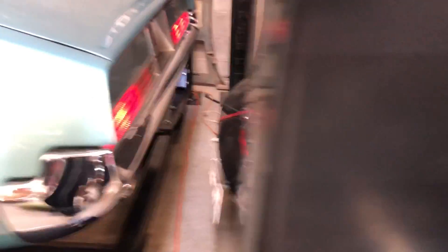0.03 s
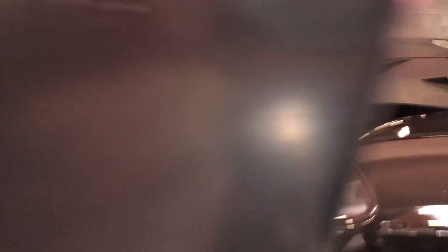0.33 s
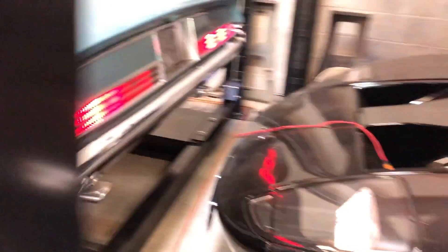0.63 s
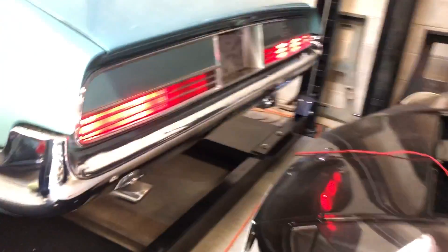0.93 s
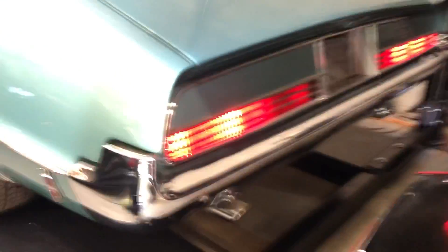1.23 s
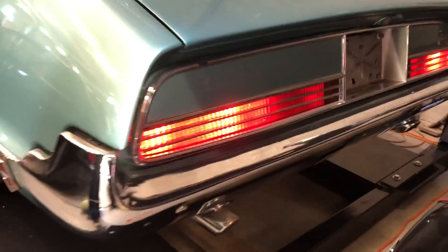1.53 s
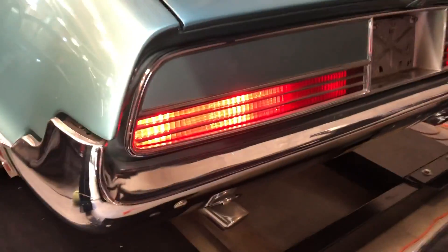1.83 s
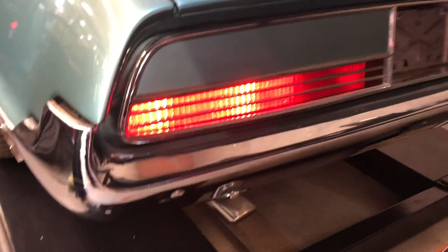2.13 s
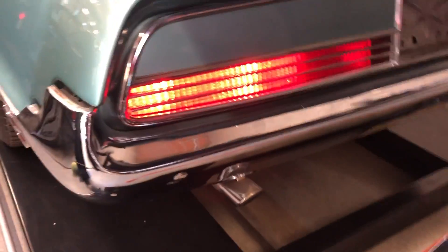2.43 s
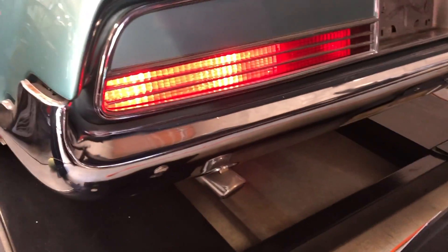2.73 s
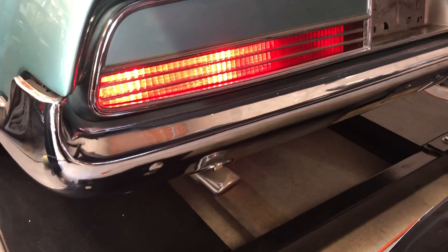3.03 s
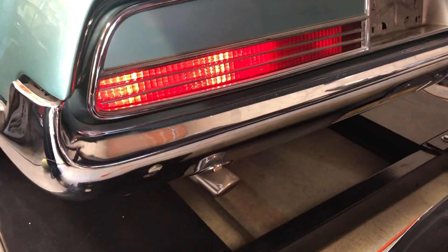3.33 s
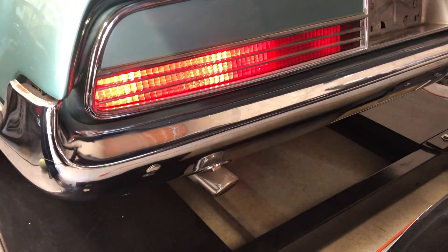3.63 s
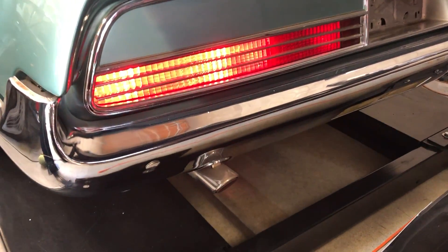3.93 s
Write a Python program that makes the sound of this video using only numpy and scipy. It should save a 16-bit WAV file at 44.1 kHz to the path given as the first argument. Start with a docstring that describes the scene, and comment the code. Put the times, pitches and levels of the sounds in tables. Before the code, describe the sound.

A classic V8 car engine starts in a quiet garage, near the end. For the first three seconds there are only soft shoe scuffs, ticks, thuds and rustling clothes over faint air noise and a hum. At about 3.1 seconds the starter clacks in and grinds briefly. Around 3.5 seconds the engine catches with a loud, booming roar, just beginning to settle by 4 seconds.

```python
"""A classic V8 starts in a quiet garage: it catches, flares with a roar and begins to settle.
Each firing sends a pulse and a gas puff down a ringing pipe, over the boom of the uneven banks.
Just before, the starter clacks in and its gears grind for a third of a second.
First, someone steps up to the tail: soles scuff, clothes rustle, shoes and handling tick and thud.
Air noise and a faint appliance hum lie underneath."""
import sys
import numpy as np
from scipy import signal
from scipy.fft import rfft
from scipy.io import wavfile
from scipy.ndimage import uniform_filter1d

SR = 44100
rng = np.random.default_rng(int(sys.argv[2]) if len(sys.argv) > 2 else 0)


def to_wav(s):
    """Save 16-bit WAV."""
    ch = np.atleast_2d(s).T  # columns
    pcm = np.round(np.clip(ch, -1, 1) * 32767)  # PCM
    wavfile.write(sys.argv[1], SR, pcm.astype(np.int16))


N = 176400
TIME_S = np.arange(N) / SR
FREQ_HZ = np.fft.rfftfreq(N, 1 / SR)

# garage reverberation: freq_hz, t60_s
ROOM_DECAY = [(100, 0.52), (1000, 0.46), (2000, 0.58), (3000, 1), (4500, 0.7), (7000, 0.44), (15000, 0.36)]
# room air: freq_hz, gain_db
AIR_SPECTRUM = [(25, -27), (55, 5.5), (108, -1.5), (212, 1.5), (516, -13.5), (624, -11), (677, -10),
                (754, -16.5), (988, -17.5), (2700, -28.5), (8360, -42), (14800, -48), (16000, -30)]
# appliance hum: pitch_hz, level_db
HUM_TONES = [(665, -88), (688.5, -67.5)]

# cloth rustle: time_s, body_db, fizz_db
RUSTLE_LEVELS = [(0, -63, -70.5), (.27, -66, -67), (.38, -67, -73), (.72, -63, -69.5), (.85, -56.5, -62),
                 (1.0, -61, -69), (1.2, -66.5, -72.5), (1.4, -65, -73), (1.62, -63, -64), (1.68, -73, -72),
                 (1.77, -66.5, -87), (1.85, -59, -82), (2.12, -60, -74), (2.33, -80, -82),
                 (2.62, -66, -84.5), (2.8, -71.5, -80.5), (3.05, -74, -89)]
# cloth body: freq_hz, gain_db
CLOTH_SPECTRUM = [(200, 4.5), (1000, 3), (3000, -2.5), (5500, -7.5), (8000, -17.5), (16000, -29)]
# cloth fizz: freq_hz, gain_db
FIZZ_SPECTRUM = [(1000, -50), (5000, -0.5), (8000, -3), (16000, -2)]

# shoe scuffs: start_s, length_s, sole_db, grit_db
SHOE_SCUFFS = [(0.58, 0.022, -56, -76), (0.653, .004, -77, -71), (0.739, 0.014, -54.5, -51),
               (0.814, .006, -52, -66), (0.918, 0.01, -60, -61), (1.385, 0.012, -51.5, -59),
               (1.4, 0.034, -47.5, -51.5), (1.447, 0.015, -58, -63), (1.537, 0.0091, -60, -70),
               (1.925, 0.02, -59, -59), (1.943, 0.023, -55.5, -62), (1.985, 0.0074, -62, -51),
               (2.154, 0.017, -52, -58), (2.178, 0.018, -47.5, -49.5), (2.207, 0.037, -54, -77),
               (2.368, 0.05, -41, -54)]
# ring of sole and floor: freq_hz, width_hz, peak_db
SOLE_MODES = [(1034, 59, 12.5), (2750, 140, 2.5)]
# sole scrape: freq_hz, gain_db
SOLE_SPECTRUM = [(100, -15), (500, -9), (1050, -5.5), (1800, 0), (2900, -0.5), (4500, -2), (7000, -4),
                 (9000, -12.5), (16000, -15)]
# dragged grit: freq_hz, gain_db
GRIT_SPECTRUM = [(1000, -3), (4000, -11), (7000, 1.5), (9000, -2.5), (16000, -3)]

# ticks and thuds of shoes and handling: start_s, tick_db, tilt_db_per_octave, thud_db, thud_hz
TICKS_AND_THUDS = [(0.583, -44, -6, -64, 400), (0.7394, -37, -2, -50, 422), (.869, -60, -9, -48, 470),
                   (1.053, -70, 2, -41.5, 440), (1.228, -48, -4, -41.5, 280), (1.301, -38, 0.5, -63, 600),
                   (1.32, -38, -3, -41, 350), (1.384, -37.5, -5, -42.5, 343), (1.394, -51, -14, -41, 650),
                   (2.156, -39, 1, -60, 600), (3.013, -79, -5, -39, 159)]
# sharp tick: freq_hz, gain_db
TICK_SPECTRUM = [(100, -12), (1000, -1.5), (5000, -6.5), (9000, -11), (16000, -4.5)]

# starter body ring: pitch_hz, level_db
CLUNK_TONES = [(410, -35.5), (522, -38), (764, -34.5)]
# starter and drive knocks: start_s, level_db, tilt_db_per_octave, decay_s, ring_hz, ring_db
METAL_KNOCKS = [(3.095, -38, -0.8, 0.044, 5920, 9), (3.12, -30, -2.54, 0.031, 1140, 9),
                (3.373, -34.5, -3, 0.049, 1427, 23), (3.378, -39.5, 2.5, 0.081, 5070, 17),
                (3.442, -33, 6, 0.013, 4600, 1), (3.472, -22.5, 12.5, 0.0097, 7950, 15),
                (3.493, -27, -9, 0.014, 1350, 8), (3.611, -26.5, -3, 0.028, 3430, 10),
                (3.741, -30.5, -2, 0.052, 5260, 7.5), (3.864, -28, -1, 0.042, 2740, 11)]
# metal knock: freq_hz, gain_db
KNOCK_SPECTRUM = [(59, -39), (160, -5), (289, -28), (524, -5), (621, -26), (768, -4.5), (910, -16),
                  (1580, -12), (4380, -12), (4770, -8), (16000, -27.5)]
# gear grind: time_s, level_db
GRIND_LEVELS = [(3.09, -56), (3.13, -37), (3.2, -39.5), (3.27, -38), (3.36, -37), (3.44, -31.5),
                (3.52, -22.5), (3.62, -81)]
# gear grind: freq_hz, gain_db
GRIND_SPECTRUM = [(35, -30), (60, -1.5), (139, -6), (172, 5.5), (244, -12), (338, -1), (398, -7.5),
                  (767, -1.5), (1910, -7), (2410, -7.5), (4750, -12), (6740, -22), (16000, -36.5)]
# starter housing: freq_hz, width_hz, peak_db
HOUSING_MODES = [(512, 17, 3.4), (1174, 88, 2.3), (1395, 56, 6.2), (3170, 63, 5.3), (3510, 120, 5.1),
                 (4760, 94, 3.6), (5500, 130, 6.3)]
# slipping teeth: centre_s, sigma_s, pitch_hz, level_db
TOOTH_CHIRPS = [(3.24, .011, 2640, -47), (3.317, 0.0082, 2455, -35.5), (3.386, 0.012, 1117, -36.5)]

# engine speed: time_s, firing_hz
FIRING_RATE = [(3.1, 12), (3.4, 26), (3.44, 38), (3.48, 42), (3.53, 60), (3.56, 63), (3.6, 69.5),
               (3.65, 75), (3.78, 76.3), (3.85, 72.3), (4.0, 71.5)]
# cylinders in firing order, near bank louder: gain_db
CYLINDER_GAINS_DB = [4.5, 0, 2, 1.5, 0.5, -0.5, 4, 0]
# exhaust boom: time_s, tone_db, beat_db
BOOM_LEVELS = [(3.1, -72, -70), (3.42, -62, -52), (3.465, -33.5, -31), (3.505, -29, -25.5),
               (3.54, -16.5, -26.5), (3.6, -18, -27), (3.635, -20, -17.5), (3.67, -16.5, -27),
               (3.76, -21, -21), (3.86, -20, -28.5), (3.92, -28, -31), (3.955, -36, -35),
               (3.985, -21.5, -41)]
# beat of the banks: multiple_of_four_stroke_cycle, gain_db
BEAT_ORDERS = [(5, -11), (7, -8), (11, -4), (13, -0.5), (16, 0.5), (19, -0.5), (21, -14.5), (24, -14)]
# exhaust roar: time_s, bark_db, hiss_db
ROAR_LEVELS = [(3.36, -70, -53), (3.44, -55, -36.5), (3.48, -32.5, -25), (3.53, -24, -31),
               (3.565, -19, -26.5), (3.61, -30.5, -33), (3.68, -27.5, -32.5), (3.78, -30, -33),
               (3.84, -26.5, -33), (3.885, -26, -42), (3.94, -32, -46), (4.0, -31.5, -42.5)]
# exhaust bark: freq_hz, gain_db
BARK_SPECTRUM = [(60, -22), (180, 5), (260, -10), (400, -2), (560, -2.5), (800, -8), (1100, -10.5),
                 (1450, -7), (1650, -15), (2500, -23.5), (8000, -40)]
# gas hiss: freq_hz, gain_db
HISS_SPECTRUM = [(300, -24), (1200, -1), (1800, -3.5), (2700, 0), (3600, -3.5), (4400, -4.5), (5300, -2.5),
                 (7000, -6.5), (10000, -9), (13000, -12.5), (16000, -16.5)]
# ring of pipe and car body: freq_hz, width_hz, peak_db
PIPE_MODES = [(410, 58, 5.5), (540, 44, 8), (664.5, 32, 9.5), (823, 26, 5.5), (1294, 28, 6.5),
              (1510, 44, 8.5), (1740, 16, 5), (1891, 12.4, 13.5), (2300, 96, 2.5), (2790, 110, 3.5),
              (3750, 42, 5.5)]


def amp(db):
    """Decibels to gain."""
    return 10 ** (np.asarray(db) / 20)


def unit(x):
    """Scale to rms 1."""
    return x / np.sqrt(np.mean(x ** 2) + 1e-20)


def curve(rows, column=1):
    """One column of a time table at every sample."""
    rows = np.array(rows)
    return np.interp(TIME_S, rows[:, 0], rows[:, column])


def at_freq(rows, hz):
    """Interpolate a table over log frequency."""
    row_hz, values = np.transpose(rows)
    return np.interp(np.log(hz + 1), np.log(row_hz + 1), values)


def colour(x, spectrum, tilt_db_per_octave=0, modes=()):
    """Filter by spectrum, tilt and resonant peaks; rms 1."""
    octaves = np.log2(np.maximum(FREQ_HZ, 200) / 2000)
    gain_db = at_freq(spectrum, FREQ_HZ) + tilt_db_per_octave * octaves
    for hz, width_hz, peak_db in modes:
        gain_db += peak_db / (1 + (2 * (FREQ_HZ - hz) / width_hz) ** 2)
    return unit(np.fft.irfft(rfft(x) * amp(gain_db), N))


def noise(spread_db=0):
    """White noise, its level varying from grain to grain by spread_db; rms 1."""
    white = rng.standard_normal(N)
    grains = unit(uniform_filter1d(rng.standard_normal(N), size=24))
    return unit(white * amp(spread_db * grains))


def drift(hz):
    """Random wander, low-passed at hz; rms 1."""
    return unit(np.fft.irfft(rfft(rng.standard_normal(N)) / (1 + (FREQ_HZ / hz) ** 4), N))


def garage(x, wet_db):
    """Add dense reflections, each band dying at its own rate."""
    echoes = rng.standard_normal(SR) * (rng.random(SR) < .1) * (TIME_S[:SR] > .005)
    hz, age_s, bands = signal.stft(echoes, SR, nperseg=256)
    decay = amp(-60 * age_s / at_freq(ROOM_DECAY, hz)[:, None])
    tail = signal.istft(bands * decay, SR, nperseg=256)[1]
    wet = signal.fftconvolve(x, tail / np.linalg.norm(tail))[:N]
    return (x + amp(wet_db) * wet) / np.hypot(1, amp(wet_db))


def background(air_db=-54, waver_rad=0.35):
    """Low air noise and a wavering appliance hum."""
    hum = sum(amp(db) * np.sqrt(2) * np.sin(2 * np.pi * hz * TIME_S + waver_rad * drift(hz=1.7))
              for hz, db in HUM_TONES)
    return amp(air_db) * colour(noise(), AIR_SPECTRUM) + hum


def clothes(flicker_db=1.8):
    """Cloth rubs softly, with a fine fizz on top."""
    body = amp(curve(RUSTLE_LEVELS)) * colour(noise(spread_db=2.5), CLOTH_SPECTRUM)
    fizz_db = curve(RUSTLE_LEVELS, column=2) + flicker_db * drift(hz=24)
    return body + amp(fizz_db) * colour(noise(spread_db=2.5), FIZZ_SPECTRUM)


def shoes(rise_s=0.0064, fall_s=0.009):
    """Soles scrape on concrete and drag grit along."""
    sole_gain, grit_gain = np.zeros((2, N))
    for start_s, length_s, sole_db, grit_db in SHOE_SCUFFS:
        age_s = TIME_S - start_s
        envelope = np.clip(age_s / rise_s, 0, 1) * np.exp(-np.maximum(age_s - length_s, 0) / fall_s)
        sole_gain += amp(sole_db) * envelope
        grit_gain += amp(grit_db) * envelope
    scrape = sole_gain * colour(noise(spread_db=0.5), SOLE_SPECTRUM, modes=SOLE_MODES)
    grit = grit_gain * colour(noise(spread_db=0.5), GRIT_SPECTRUM)
    return garage(scrape + grit, wet_db=-9)


def ticks_and_thuds(tick_s=0.00057, thud_s=0.0033, sag_s=0.0012, sag_depth=1.63):
    """Shoes and handling: sharp ticks, and soft thuds that drop quickly to their pitch."""
    out = np.zeros(N)
    for start_s, tick_db, tilt, thud_db, thud_hz in TICKS_AND_THUDS:
        age_s = np.maximum(TIME_S - start_s, 0)
        tick_envelope = age_s / tick_s * np.exp(1 - age_s / tick_s)
        thud_envelope = age_s / thud_s * np.exp((1 - (age_s / thud_s) ** 2) / 2)
        cycles = thud_hz * (age_s + sag_depth * sag_s * (1 - np.exp(-age_s / sag_s)))
        out += amp(tick_db) * tick_envelope * colour(noise(), TICK_SPECTRUM, tilt)
        out += amp(thud_db) * thud_envelope * np.sin(2 * np.pi * cycles)
    return out


def pinion_clunk(start_s=3.12, t60_s=0.33):
    """The pinion hits home and rings the starter body."""
    age_s = np.maximum(TIME_S - start_s, 0)
    return sum(amp(db - 60 * age_s / t60_s) * np.sin(2 * np.pi * hz * age_s) for hz, db in CLUNK_TONES)


def starter(mesh_hz=382.7, mesh_depth=0.41, ring_width_ratio=0.06):
    """Gear teeth grind, solenoid and drive knock; both ring the housing."""
    teeth = 1 + mesh_depth * np.cos(2 * np.pi * mesh_hz * TIME_S + drift(hz=18))
    grind = colour(teeth * noise(spread_db=1.5), GRIND_SPECTRUM, modes=HOUSING_MODES)
    out = amp(curve(GRIND_LEVELS)) * (TIME_S > GRIND_LEVELS[0][0]) * grind
    for start_s, level_db, tilt, decay_s, ring_hz, ring_db in METAL_KNOCKS:
        age_s = np.maximum(TIME_S - start_s, 0)
        envelope = np.minimum(age_s / 0.0058, 1) * np.exp(-(age_s / decay_s) ** 2 / 2)
        modes = HOUSING_MODES + [(ring_hz, ring_hz * ring_width_ratio, ring_db)]
        out += amp(level_db) * envelope * colour(noise(spread_db=0.5), KNOCK_SPECTRUM, tilt, modes)
    return garage(out, wet_db=-8)


def gear_chirps(waver_rad=0.5):
    """Slipping teeth give short, uneven squeaks."""
    out = np.zeros(N)
    for centre_s, sigma_s, pitch_hz, level_db in TOOTH_CHIRPS:
        envelope = np.exp(-((TIME_S - centre_s) / sigma_s) ** 2 / 2)
        phase_rad = 2 * np.pi * pitch_hz * TIME_S + waver_rad * drift(hz=90.5)
        out += amp(level_db) * envelope * np.sin(phase_rad)
    return out


def exhaust_boom(firings, waver_rad=0.24):
    """The firing tone, plus the uneven beat of the two banks at orders around it."""
    tone = np.sqrt(2) * np.sin(2 * np.pi * firings + waver_rad / 2 * drift(hz=23))
    cycles = firings / len(CYLINDER_GAINS_DB)
    beat = sum(amp(db) * np.sin(2 * np.pi * (order * cycles + rng.random()) + waver_rad * drift(hz=13))
               for order, db in BEAT_ORDERS)
    boom = amp(curve(BOOM_LEVELS)) * tone + amp(curve(BOOM_LEVELS, column=2)) * unit(beat)
    return (TIME_S > BOOM_LEVELS[0][0]) * boom


def exhaust_roar(firings, puff_decay_firings=0.31, puff_floor=0.87, pulse_db=-8.5):
    """Each firing sends a pulse and a puff of gas down the ringing pipe."""
    index = firings.astype(int)
    cylinder_db = np.array(CYLINDER_GAINS_DB)[index % len(CYLINDER_GAINS_DB)]
    scatter_db = 1.26 * rng.standard_normal(N)[index]  # a cold engine burns unevenly
    strength = amp(cylinder_db + scatter_db)
    puffs = strength * (puff_floor + np.exp(-(firings % 1) / puff_decay_firings))
    pulses = strength * np.diff(index, prepend=0) / np.sqrt(curve(FIRING_RATE))
    drive = unit(puffs * noise()) + amp(pulse_db) * unit(pulses)
    bright = colour(drive, BARK_SPECTRUM, modes=PIPE_MODES)
    dark = colour(drive, BARK_SPECTRUM, tilt_db_per_octave=-5.5, modes=PIPE_MODES)
    throttle_shut = np.interp(TIME_S, [3.59, 3.75], [0, 1])
    bark = (1 - throttle_shut) * bright + throttle_shut * dark
    hiss = colour(puffs * noise(spread_db=1.0), HISS_SPECTRUM, modes=PIPE_MODES)
    roar = amp(curve(ROAR_LEVELS)) * bark + amp(curve(ROAR_LEVELS, column=2)) * hiss
    return garage((TIME_S > ROAR_LEVELS[0][0]) * roar, wet_db=2.5)


def scene():
    """Car, garage and person, in mono."""
    firings = np.cumsum(curve(FIRING_RATE)) / SR
    car = pinion_clunk() + starter() + gear_chirps() + exhaust_boom(firings) + exhaust_roar(firings)
    return (background() + clothes() + shoes() + ticks_and_thuds() + car)[None]


def record(dry):
    """Steep low-pass at 15950 Hz."""
    lowpass = signal.firwin(511, 15950, window=("kaiser", 9), fs=SR)
    return signal.oaconvolve(dry, lowpass[None], "same")


dry = scene()
out = record(dry)
to_wav(out)
```